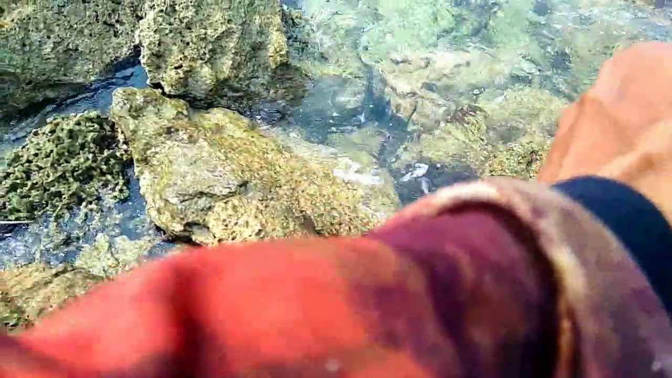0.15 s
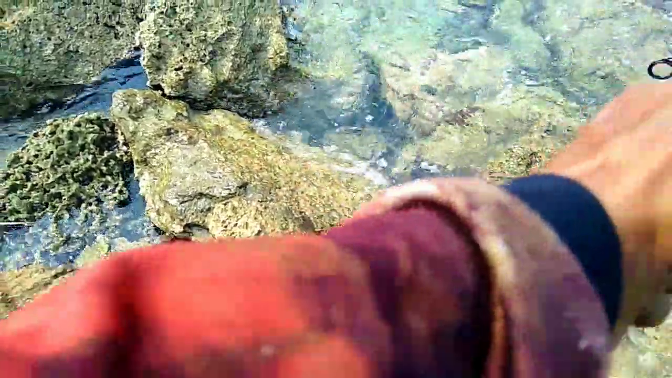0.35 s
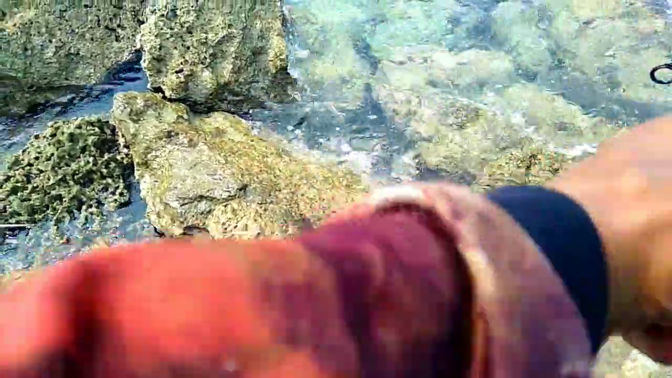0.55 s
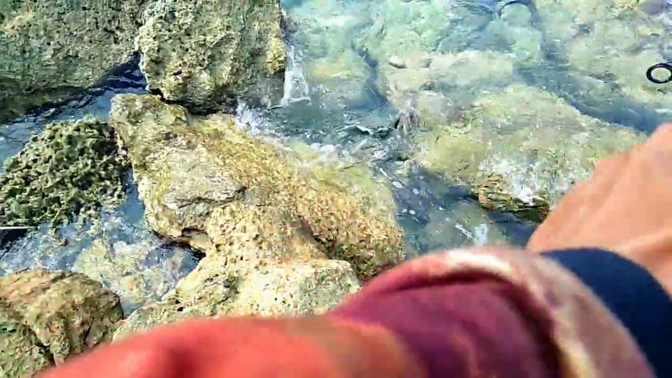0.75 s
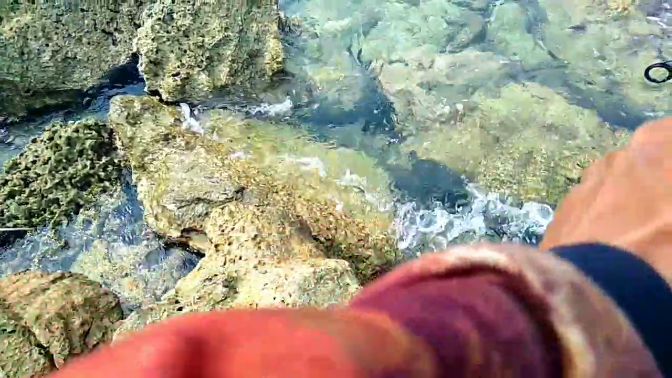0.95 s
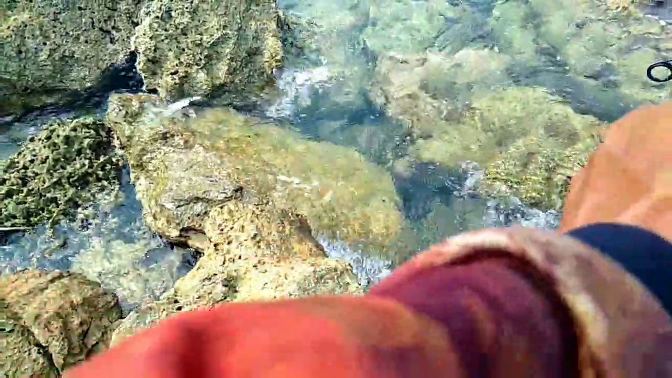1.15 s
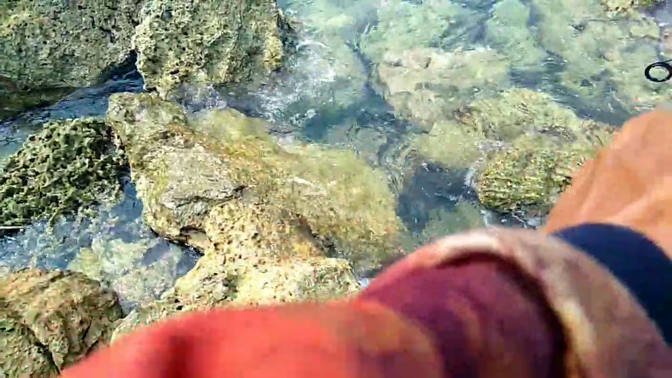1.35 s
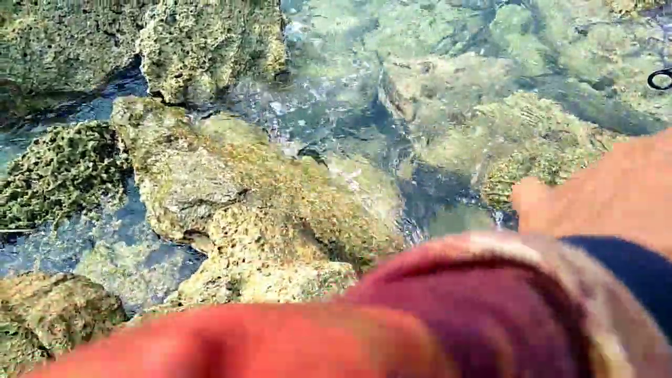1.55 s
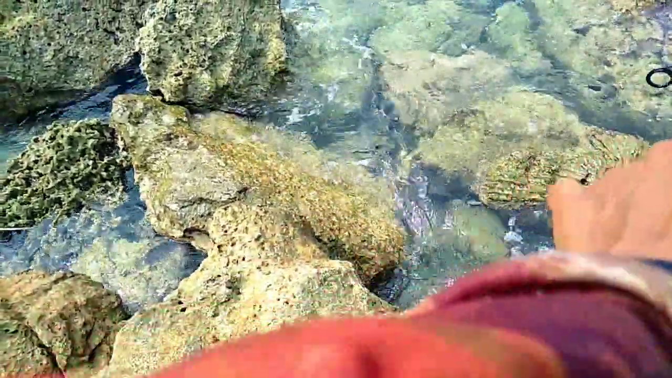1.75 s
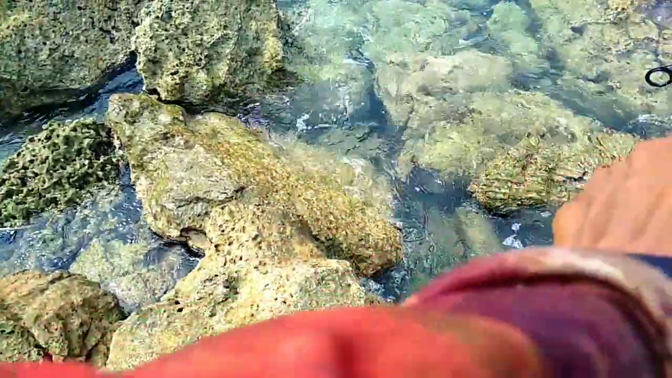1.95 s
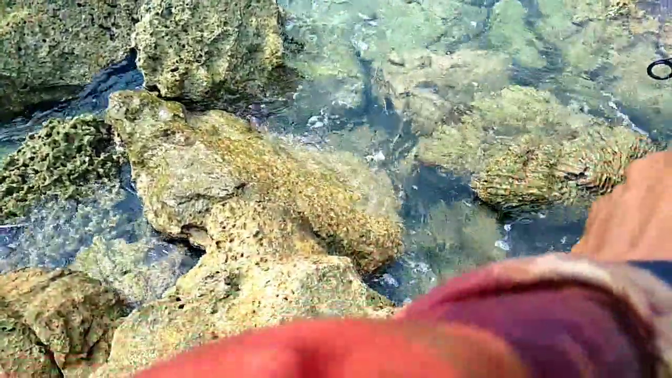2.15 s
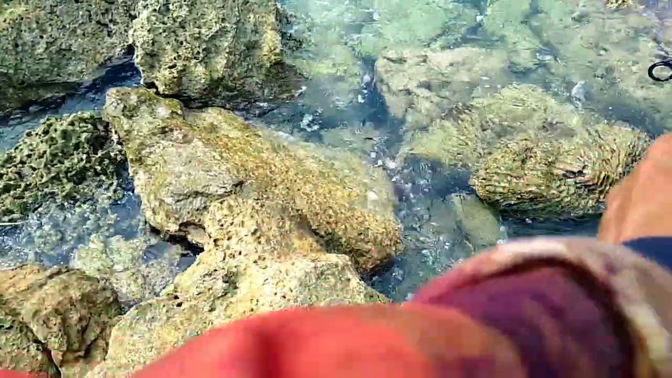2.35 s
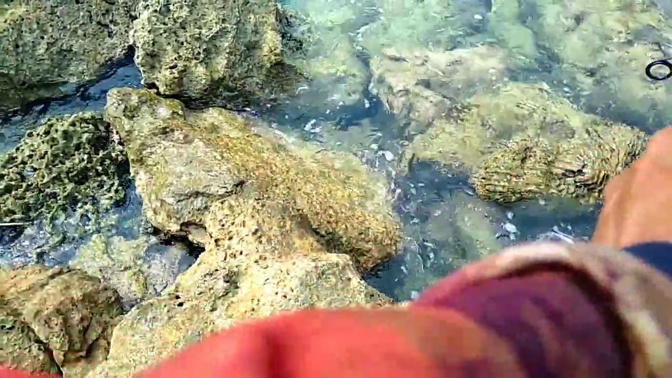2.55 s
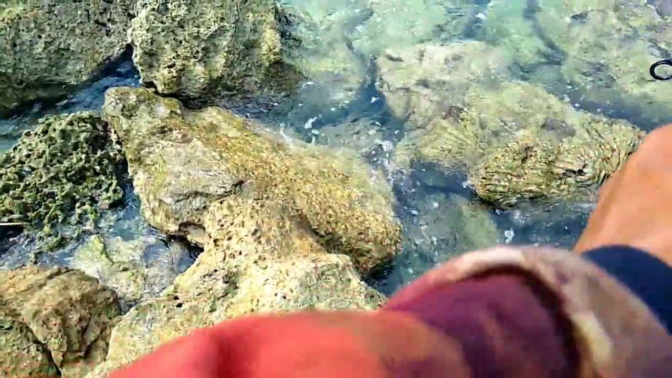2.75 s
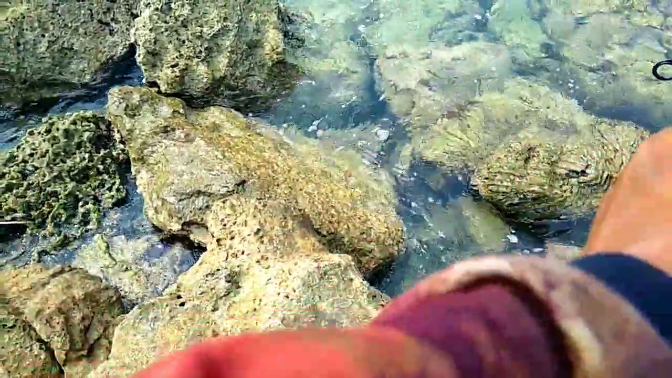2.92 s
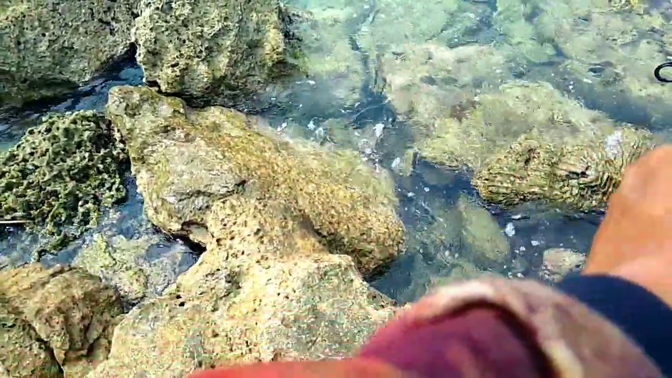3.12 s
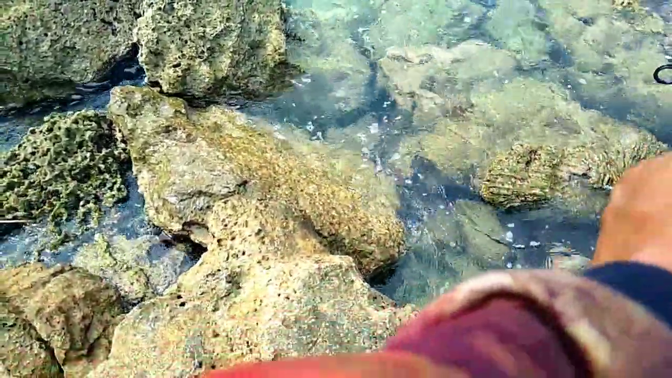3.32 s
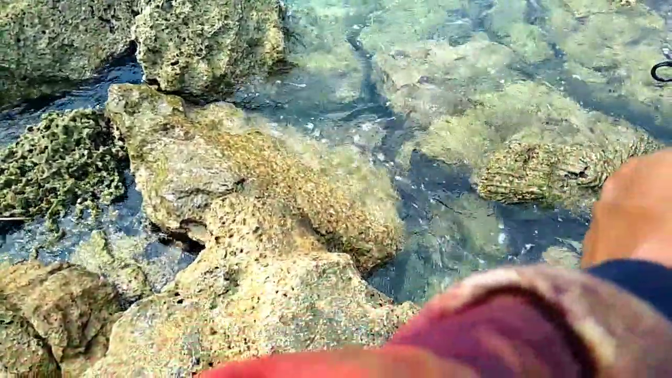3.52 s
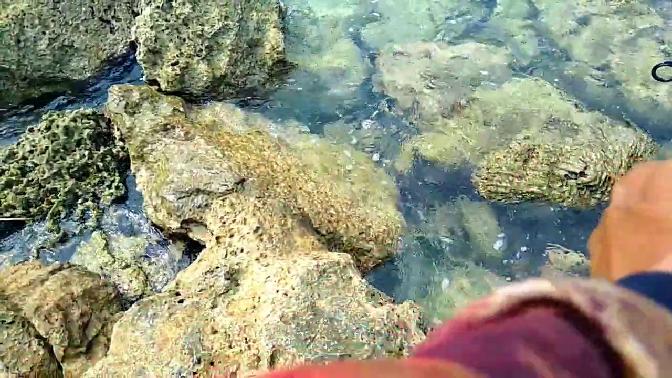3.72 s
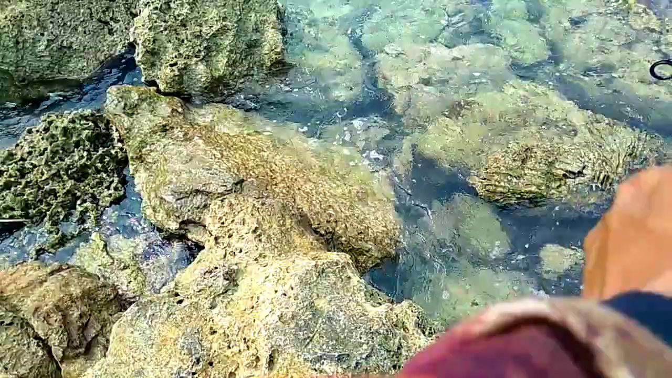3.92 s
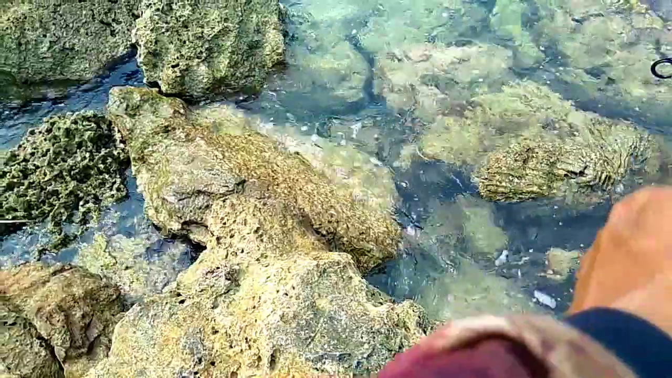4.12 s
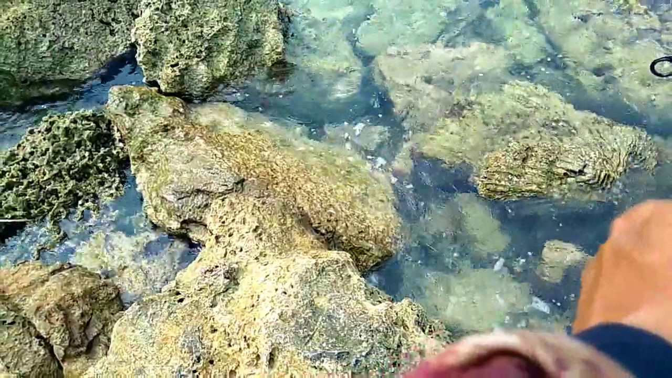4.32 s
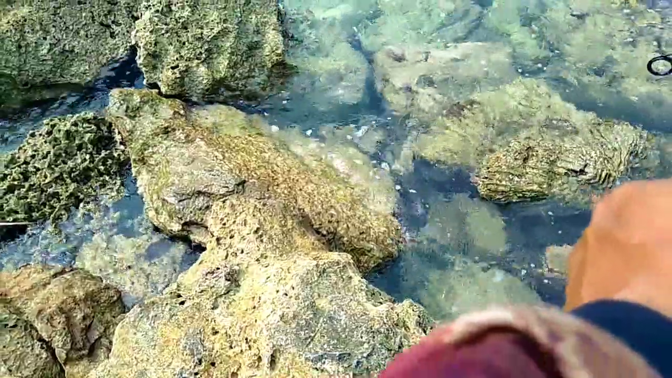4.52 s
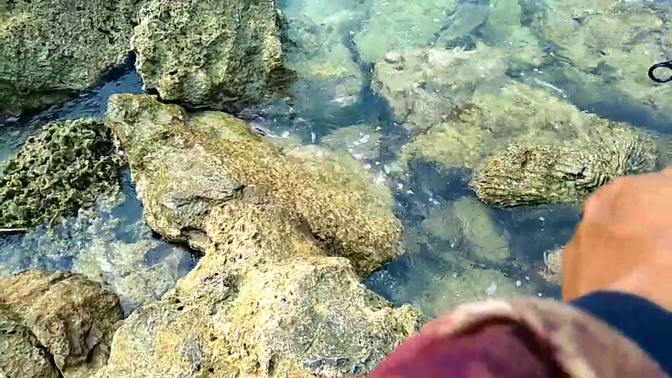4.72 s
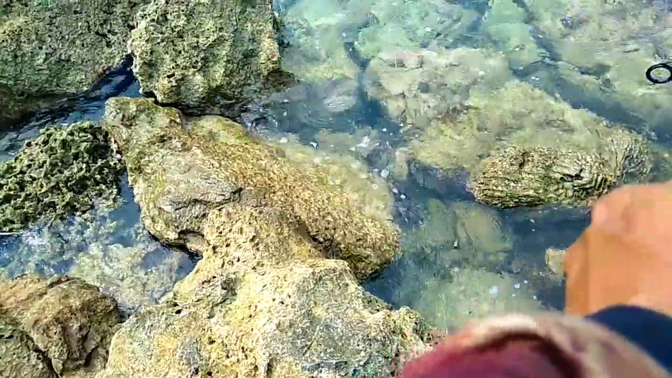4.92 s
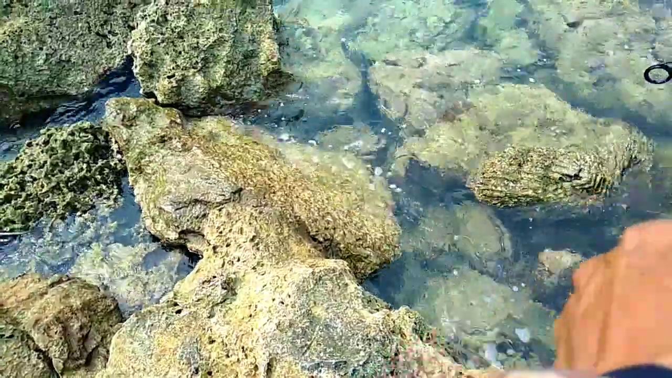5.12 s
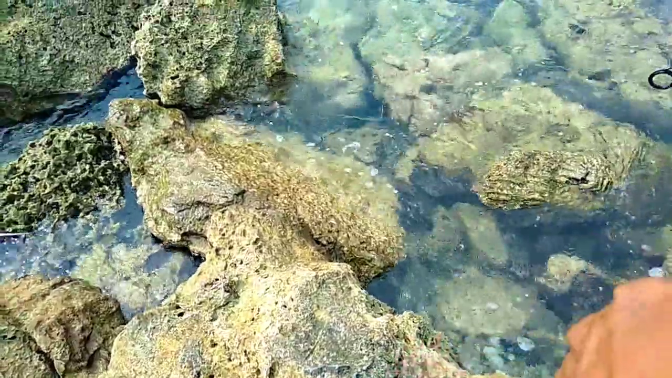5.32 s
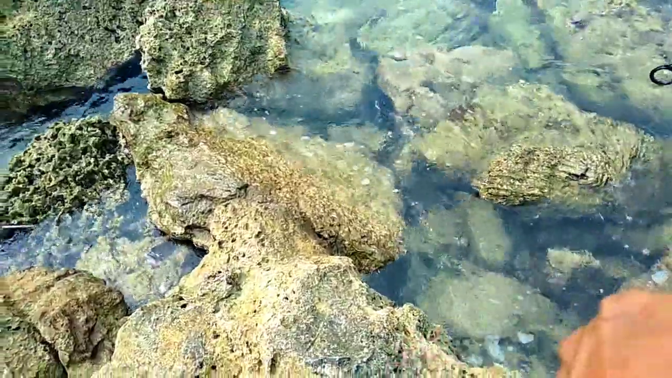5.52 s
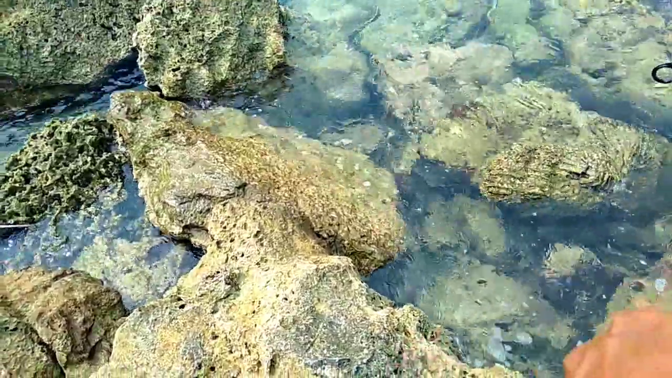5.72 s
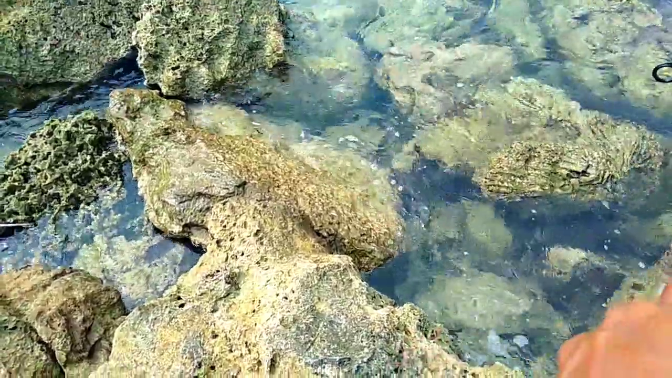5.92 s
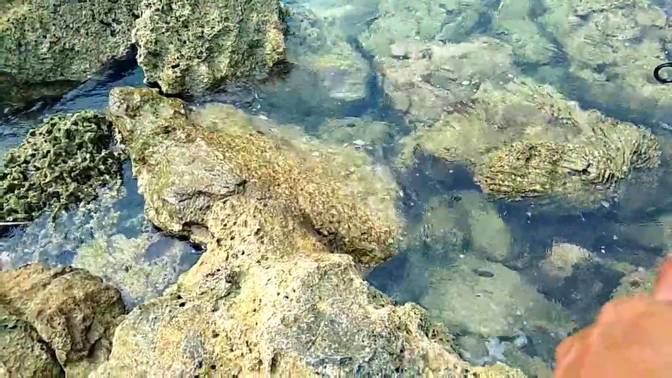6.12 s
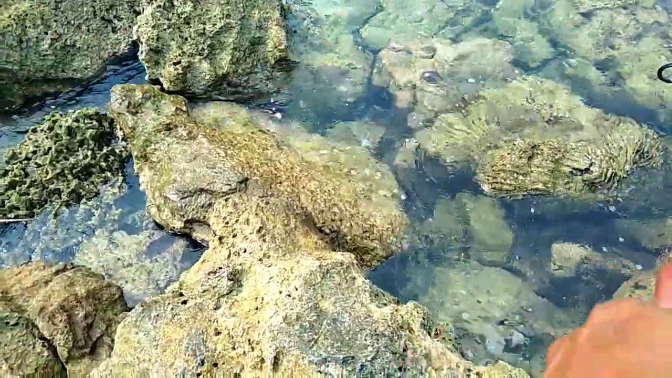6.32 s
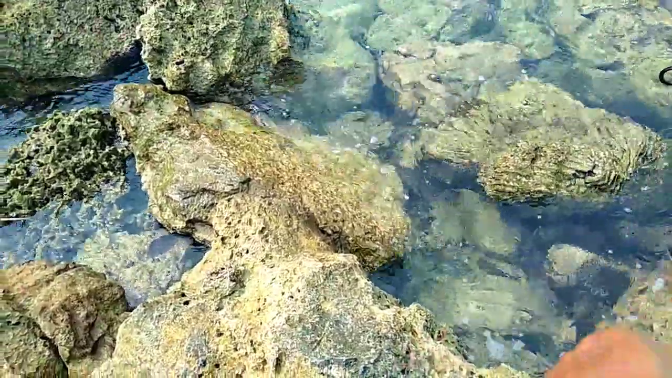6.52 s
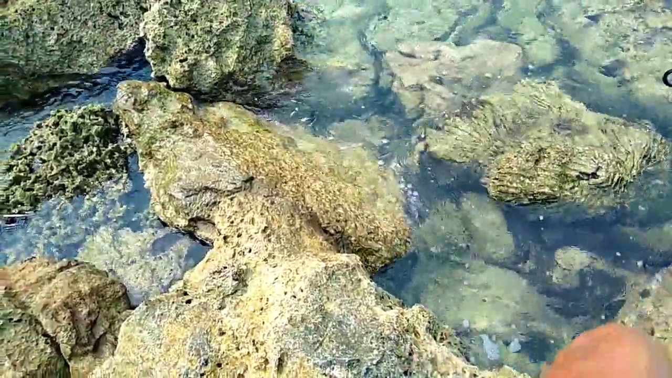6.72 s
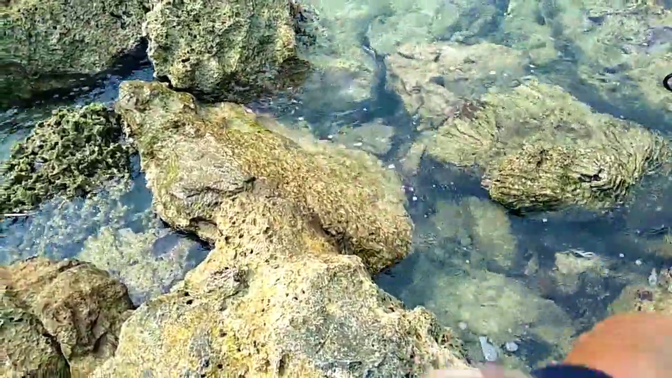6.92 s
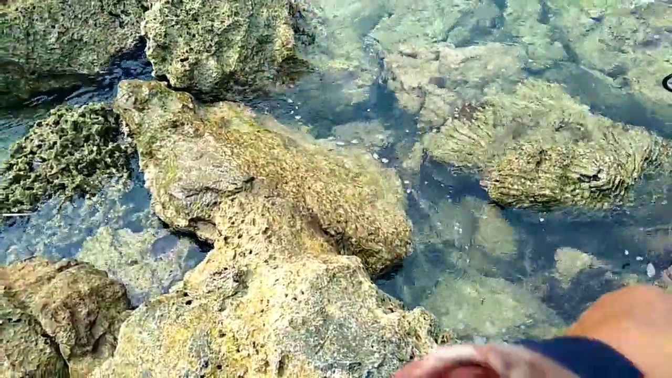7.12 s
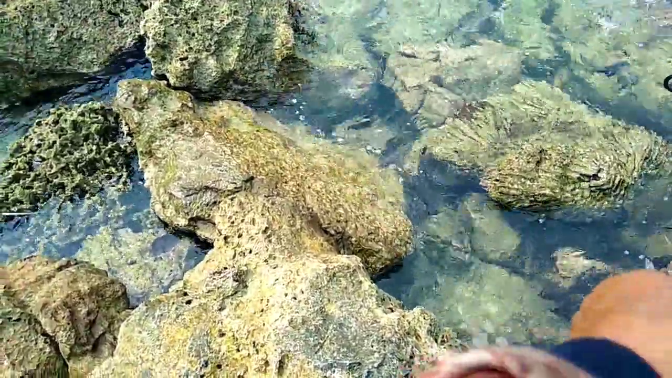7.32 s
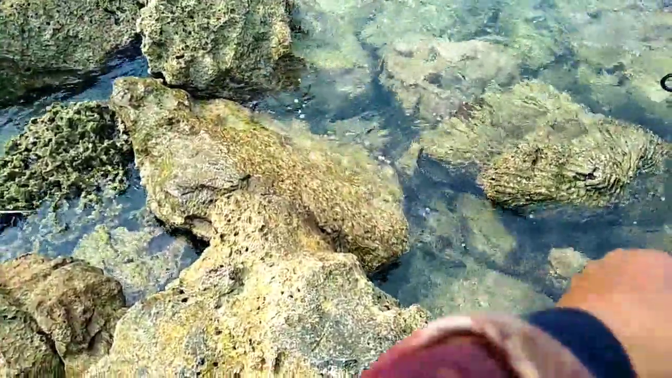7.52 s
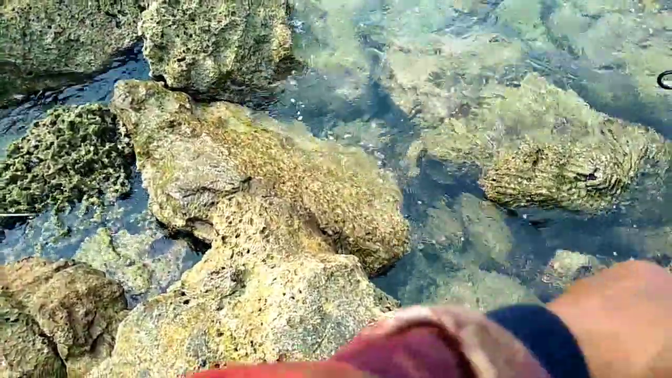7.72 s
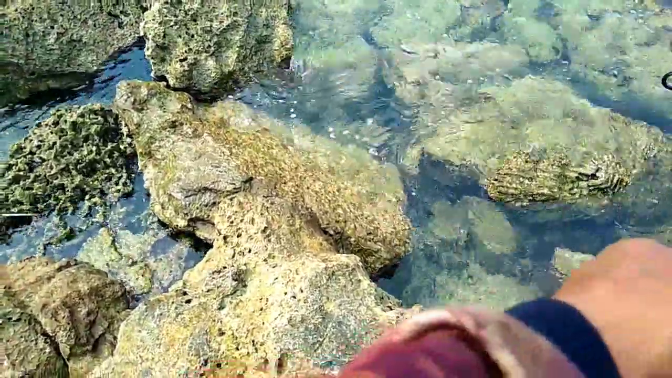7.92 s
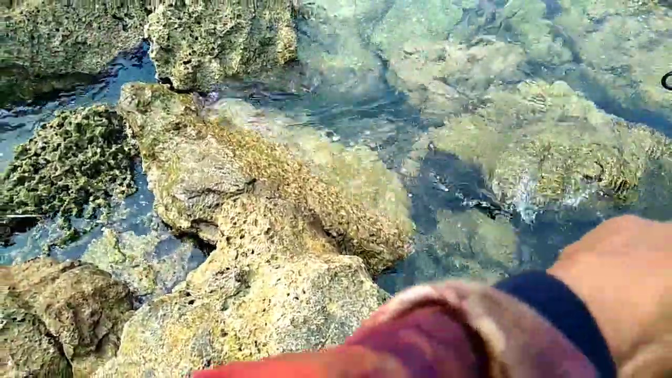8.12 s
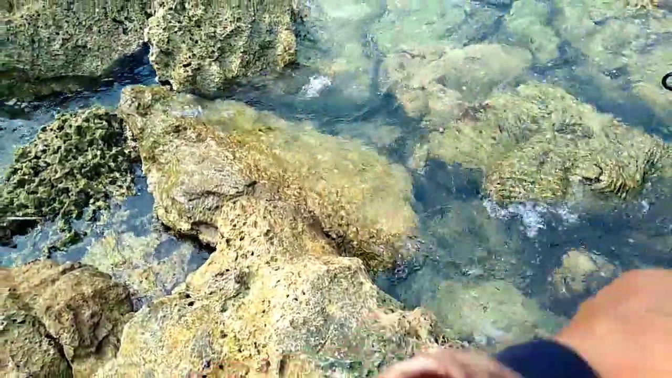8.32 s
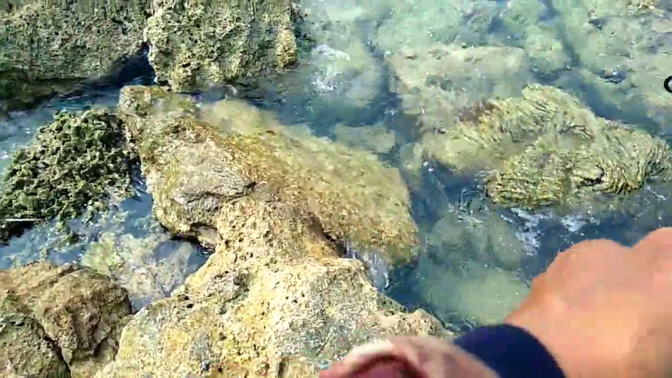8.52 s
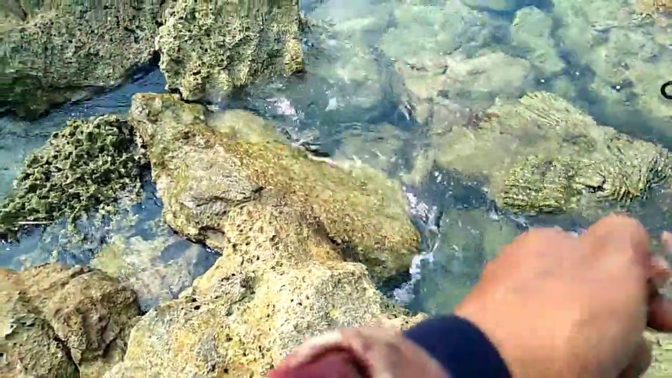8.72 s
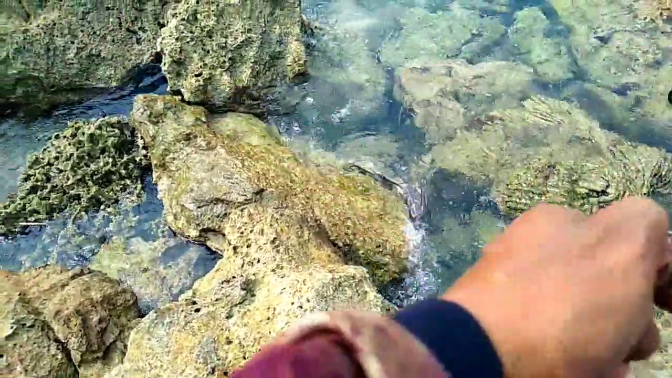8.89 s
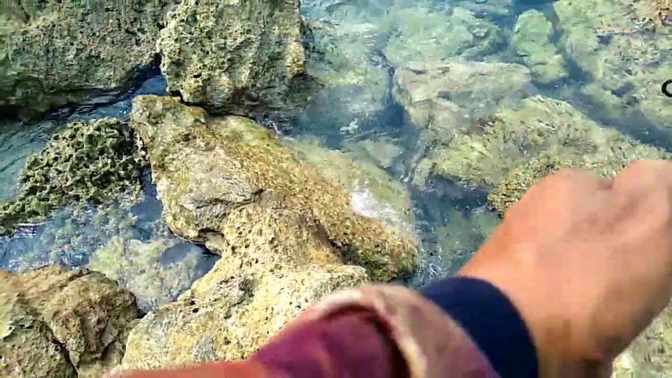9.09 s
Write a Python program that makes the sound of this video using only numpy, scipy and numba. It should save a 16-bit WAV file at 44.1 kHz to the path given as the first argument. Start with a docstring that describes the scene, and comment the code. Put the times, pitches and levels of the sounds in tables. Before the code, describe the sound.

Bubbly water sloshes and glugs among rocks, drains to quiet trickling drops with low wind puffs on the right, then splashes back strongly.

```python
"""A shallow shore of coral rocks: seawater surges over them, drains away in trickles and drips, and surges again.
The water is a swarm of ringing bubbles: big ones gurgle in the hollows, small ones slosh and tinkle, spray crackles.
One flow curve sets how hard the water works; wavelets splash on top of it and slap bubble clusters into crevices.
Drops, plops and glugs stand out of the ebb, and cavities ring upward as they fill; open water washes faintly behind.
A breeze buffets the right microphone port in gusts of short low puffs."""
import sys
import numpy as np
from scipy import signal
from scipy.fft import rfft, irfft
from scipy.io import wavfile
from scipy.ndimage import uniform_filter1d
from numba import njit

SR = 44100
rng = np.random.default_rng(int(sys.argv[2]) if len(sys.argv) > 2 else 0)


def unload_wav(signal):
    """Save mono or channel-first audio to the path in sys.argv[1] as 16-bit WAV at rate SR, clipped to [-1, 1]."""
    wavfile.write(
        sys.argv[1],
        SR,
        np.round(np.clip(np.atleast_2d(signal).T, -1, 1) * 32767).astype(np.int16),
    )


N = 403515
T = np.arange(N) / SR

# All levels are those before record(), which also turns everything down.
# air pockets closing under the rocks:
# (time [s], peak level [dB], pitch [Hz], left minus right [dB], fading time [cycles])
GLUG_EVENTS = [(0.835, -18.5, 297, -2, 1.3), (1.137, -15.5, 235, -1, 7.5), (1.292, -13, 368, -9, 3.1),
               (1.332, -0.5, 273, -2.5, 1.3), (1.44, -11, 330, 0, 1.4), (1.868, -14.5, 466, -2, 2.7),
               (2.241, -16, 350, -3, 0.9), (2.976, -11, 356, -11, 1.6), (3.319, -25.5, 291, -3, 5.4),
               (3.429, -26, 138, -5, 1.8), (3.525, -24, 325, -7, 1.4), (3.832, -21, 150, -17, 1.2),
               (3.943, -18.5, 180, -10, 2.4), (3.96, -32, 422, -3, 6.4), (4.049, -28, 197, -5, 1.3),
               (4.302, -12.5, 259, 2, 3), (4.405, -13.5, 275, -4, 3), (4.449, -20, 165, -15, 1.5),
               (4.515, -15.5, 397, -6, 1.8), (4.568, -21.5, 425, 2, 5.7), (4.764, -22, 181, -5, 0.72),
               (4.894, -26, 205, -5, 2.2), (4.996, -20.5, 278, -3, 3.1), (5.421, -24, 186, -5, 1),
               (5.526, -28, 205, -1, 1.1), (5.683, -11, 234, -1, 0.49), (5.718, -13, 308, -3, 0.58),
               (5.732, -13, 248, -2, 4.1), (6.05, -20, 164, -6, 1.3), (6.261, -21, 128, -5, 1.3),
               (6.307, -14, 290, -5, 1.3), (6.676, -21, 215, -9, 1.6), (6.785, -17.5, 184, 0, 0.62),
               (7.0, -30, 195, -4, 3.3), (7.526, -29, 159, 0, 1.8), (7.63, -22, 208, -1, 1.2),
               (7.674, -21, 435, 1, 4.7), (7.904, -20, 402, -1, 8.6), (7.962, -14, 342, 2, 3.4),
               (8.029, -7, 430, -7, 0.77), (8.756, -8, 420, -5, 1.5), (8.997, -20, 367, -3, 5.1),
               (9.033, -14, 334, -4, 5.6)]


def undb(db):
    """Turn decibels into a gain."""
    return 10 ** (np.asarray(db) / 20)


def unit(x):
    """Scale to an rms of one."""
    return x / np.sqrt(np.mean(x ** 2))


def sides(pan_db):
    """Left and right gains with a mean of one, from left minus right in dB."""
    ratio = undb(np.atleast_1d(pan_db))
    return np.array([2 * ratio, 2 + 0 * ratio]) / (1 + ratio)


def colour(x, points):
    """Filter through (Hz, dB) points; the cepstrum makes a filter that never sounds ahead of its input."""
    hz, db = np.transpose(points)
    size = 4096
    bin_hz = np.arange(size // 2 + 1) * SR / size
    gain = undb(np.interp(np.log(bin_hz + 1), np.log(hz), db))
    cepstrum = irfft(np.log(gain))
    # fold the second half onto the first
    cepstrum[1:size // 2] *= 2
    cepstrum[size // 2 + 1:] = 0
    response = irfft(np.exp(rfft(cepstrum)))
    return signal.fftconvolve(x, response[None], axes=1)[:, :N]


@njit
def rings(start, hz, cycles, rise, glide, gains, lag):
    """Damped sines that swell over `rise` cycles and glide in pitch; each meets the two ports `lag` s apart."""
    out = np.zeros((2, N))
    for k in range(len(start)):
        for c in range(2):
            t0 = (start[k] + (c - .5) * lag[k]) * SR
            first = int(np.ceil(t0))
            last = min(N, first + int((rise + 5 * cycles[k]) * SR / hz[k]))
            for i in range(max(first, 0), last):
                n = (i - t0) * hz[k] / SR  # age in cycles
                if n < rise:
                    envelope = np.sin(np.pi / 2 * n / rise) ** 2
                else:
                    envelope = np.exp((rise - n) / cycles[k])
                turns = n * (1 + glide * n / cycles[k])
                out[c, i] += gains[c, k] * envelope * np.sin(2 * np.pi * (turns + .618 * k))
    return out


def swarm(count, low_hz, high_hz, cycles, rise, glide, spread_db, width_db, lag_ms, size=1):
    """Bubbles born in broods of `size`, close in time, pitch and place; most are faint, a few are loud."""
    birth, brood_pitch, place, vigour = np.repeat(rng.random((count // size, 4)), size, axis=0).T
    delay, own_pitch, chance, length, angle = rng.random((len(birth), 5)).T
    brood_s, kinship = .03, .9
    start = birth * (N / SR + brood_s) + brood_s * (delay ** 2 - 1)
    pitch = (kinship * brood_pitch + (1 - kinship) * own_pitch - .5) / kinship + .5
    hz = low_hz * (high_hz / low_hz) ** pitch
    # loudness follows an exponential law in dB, so that large values are rare
    gain = undb(7 * vigour - spread_db * np.log(1 - .975 * chance))
    # small bubbles make up for their short life; those too high to represent are silent
    gain = gain * hz / high_hz * (hz < .45 * SR)
    pan_db = width_db * (2 * place - 1)
    lag = lag_ms / 1000 * (2 * angle - 1)
    return rings(start, hz, cycles * (.5 + length), float(rise), float(glide), gain * sides(pan_db), lag)


def steady(x, seconds=0.25):
    """Hold the slow level of a texture at one, keeping its fast detail."""
    slow_power = uniform_filter1d(np.mean(x, axis=0) ** 2, int(seconds * SR))
    return x / np.sqrt(slow_power + 1e-12)


def splashes(count, fade_s, spread_db, bed, rise_s=0.0045):
    """Gain of little splashes that break quickly and die away, over a constant bed."""
    when, size = rng.random((count, 2)).T
    kicks = np.zeros(N)
    kicks[(when * N).astype(int)] = undb(spread_db * size)
    fading = signal.lfilter([1], [1, -np.exp(-1 / (fade_s * SR))], kicks)
    return bed + unit(uniform_filter1d(fading, int(rise_s * SR) + 1))


def rocks(x, count=6):
    """The rough rocks round the pool scatter a short tail, a different one for each spot where the water breaks."""
    t60_s, build_up_s, wet_db = .11, .0065, -4.5
    t = T[:SR // 8]
    tails = rng.standard_normal((count, 2, len(t)))
    tails *= np.exp(-np.log(1000) * t / t60_s) * (1 - np.exp(-t / build_up_s))
    tails /= np.sqrt(np.sum(tails ** 2, axis=2, keepdims=True))
    # a spot is drawn every 25 ms, and its share of the sound fades over to the next
    hold = SR // 40
    spot = np.repeat(rng.integers(0, count, N // hold + 1), hold)[:N]
    scattered = np.zeros((2, N))
    for k, tail in enumerate(tails):
        share = np.sqrt(np.abs(uniform_filter1d(1. * (spot == k), hold)))
        scattered += signal.oaconvolve(x * share, tail, axes=1)[:, :N]
    return x + undb(wet_db) * scattered


def swell(s, length, attack_s, release_s):
    """Envelope that rises, holds until `length` is over and dies away."""
    attack = np.interp(T, [s, s + attack_s], [0, 1])
    return attack * np.exp(-np.clip((T - s - length) / release_s, 0, 20))


def flow_db(full_db, slope):
    """Level of one part of the water: `full_db` in a full surge, moving `slope` dB per dB of flow."""
    # how hard the water runs over the rocks, a surge, a long ebb, a second surge: (time [s], flow [dB])
    flow_curve = [(0.0, -44), (0.38, -47.5), (0.85, -35.5), (1.25, -32.5), (1.83, -37.5), (1.95, -46),
                  (2.45, -56), (3.05, -56.5), (4.0, -58), (4.8, -61), (5.8, -61.5), (6.6, -58),
                  (7.05, -53.5), (7.6, -43), (7.85, -34), (8.15, -36), (8.7, -33.5), (9.15, -35.5)]
    full_flow_db = -42.5
    return full_db + slope * (np.interp(T, *np.transpose(flow_curve)) - full_flow_db)


def water_levels():
    """Left and right gains of spray, tinkle and slosh: the power of the flow plus that of each wavelet."""
    # wavelets slapping a rock: (time [s], length [s], level [dB], spray relative to level [dB],
    # slosh relative to level [dB], left minus right [dB])
    laps = [(0.43, 0.12, -36.5, 0.5, -2.5, 0.5), (0.545, 0.044, -36.5, -3, 6.5, -9),
            (0.795, 0.17, -31, 3.5, 1, -5), (0.953, 0.06, -41, 14, -5, -2), (1.182, 0.06, -35, 9, 11, -2),
            (1.799, 0.051, -31.5, 4, -21, 0), (1.975, 0.18, -47, 6.5, -7, 2),
            (2.184, 0.1, -39.5, 0.5, 0.5, 10), (2.531, 0.038, -40, 2, -18, -8),
            (2.624, 0.017, -49.5, 3, 9, -10), (2.769, 0.1, -46, 13, -4, 5),
            (2.904, 0.17, -62.5, 21.5, 13, 3.5), (3.093, 0.061, -62, 14, 15, 2),
            (3.24, 0.035, -61, 11, -4, -4), (3.343, 0.15, -51, 8, 1, 6), (3.45, 0.21, -61.5, 6.5, 14, 6),
            (3.696, 0.048, -61.5, 20, 16, -7), (3.831, 0.23, -57, 4.5, -18, 15),
            (4.126, 0.085, -77.5, 23, 0, 5), (4.28, 0.06, -49, 4.5, 4, 9), (4.551, 0.12, -57, 4, 9.5, 2),
            (4.937, 0.023, -68.5, 16.5, -7, 10), (5.046, 0.071, -43, 5, 2, 4),
            (5.192, 0.012, -48.5, 1, 13.5, 30), (5.932, 0.14, -71.5, 9.5, -14, 4),
            (6.268, 0.09, -61.5, 11, -12, 7), (6.367, 0.056, -57.5, 16.5, 2, 0),
            (6.44, 0.057, -64, -3, 13, 8), (6.674, 0.22, -66, 16.5, 6, -1), (7.015, 0.049, -65, 20, 0, 9),
            (7.108, 0.13, -44, 3.5, 4, 2), (7.357, 0.12, -61, 24.5, -4, 4), (7.77, 0.034, -46, 8, 20, 8),
            (8.236, 0.2, -37, 9, 7.5, 1), (8.663, 0.23, -48, 0, 13, -3), (8.955, 0.12, -28, 1, -14, 0),
            (9.039, 0.1, -28.5, 4, -1, -2)]
    attack_s, release_s = 0.0076, 0.034
    spray = undb(flow_db(-39.5, 1.38)) ** 2 * np.ones((2, 1))
    tinkle = undb(flow_db(-42, 1.36)) ** 2 * np.ones((2, 1))
    slosh = undb(flow_db(-38, 1)) ** 2 * np.ones((2, 1))
    for s, length, db, spray_db, slosh_db, pan_db in laps:
        power = (undb(db) * swell(s, length, attack_s, release_s)) ** 2
        spray += power * (undb(spray_db) * sides(pan_db)) ** 2
        tinkle += power * sides(0.22 * pan_db) ** 2
        slosh += power * undb(slosh_db) ** 2
    return np.sqrt(spray), np.sqrt(tinkle), np.sqrt(slosh)


def stirred():
    """Gain of the commotion in the hollow, which spans a short while before and after each glug."""
    stir_s = 0.037
    power = np.zeros(N)
    for s, db, *_ in GLUG_EVENTS:
        power += (undb(db) * swell(s - stir_s, 2 * stir_s, stir_s, stir_s)) ** 2
    return np.sqrt(power)


def wash():
    """Sloshing, tinkling and spray; a strong surge crowds the bubbles, a weak one leaves them single."""
    # filter curves of the four textures: (frequency [Hz], gain [dB])
    churn_colour = [(120, -33.5), (240, 7.5), (360, 13), (480, -4), (700, 1.5), (1200, -49.5)]
    slosh_colour = [(250, -30.5), (430, 4), (560, -0.5), (800, -1), (1000, -4), (1250, -9), (1800, -64.5)]
    tinkle_colour = [(800, 19.5), (1250, -2.5), (1500, 1), (2000, 3.5), (2550, 4), (3200, 0.5),
                     (4000, -15.5), (5500, -10)]
    spray_colour = [(1500, 9), (3000, -0.5), (4000, -4.5), (4700, -6.5), (5500, -2.5), (6700, -6.5),
                    (8000, -3), (10500, -3.5), (12500, -5.5), (15500, -8)]
    spray_gain, tinkle_gain, slosh_gain = water_levels()
    strength_db = 20 * np.log10(np.maximum(tinkle_gain, spray_gain).mean(axis=0))
    surge = np.clip((strength_db + 70) / 26, .35, .95)
    crowd, lone = np.sqrt(surge), np.sqrt(1 - surge)
    # little splashes that lift the tinkle and spray bubbles together
    burst = splashes(count=480, fade_s=.014, spread_db=13, bed=1.2)
    churn = swarm(count=1500, low_hz=233.0, high_hz=654.4, cycles=3.93, rise=0.73, glide=0.0492,
                  spread_db=1.5, width_db=-4.0, lag_ms=0.27)
    crowded_slosh = swarm(count=3600, low_hz=421.5, high_hz=1410, cycles=4.97, rise=0.68, glide=0.041,
                          spread_db=3.5, width_db=11.5, lag_ms=0.55, size=2)
    blips = swarm(count=400, low_hz=380, high_hz=920, cycles=7, rise=3, glide=.035,
                  spread_db=2.3, width_db=6, lag_ms=.4, size=2)
    plinks = swarm(count=2600, low_hz=1250, high_hz=4300, cycles=11, rise=3.5, glide=.008,
                   spread_db=2.5, width_db=6, lag_ms=.4, size=2)
    froth = swarm(count=14000, low_hz=1032, high_hz=4740, cycles=4.5, rise=1.8, glide=0.012,
                  spread_db=2.9, width_db=9.5, lag_ms=0.44, size=4)
    ticks = swarm(count=8000, low_hz=3800, high_hz=14000, cycles=18, rise=7, glide=0,
                  spread_db=2.3, width_db=7, lag_ms=.4)
    fizz = swarm(count=30000, low_hz=3060, high_hz=15800, cycles=7, rise=3, glide=0,
                 spread_db=2.9, width_db=12, lag_ms=.4, size=2)
    slosh = lone * unit(blips) + crowd * unit(crowded_slosh)
    tinkle = lone * unit(plinks * burst) + crowd * unit(froth * burst ** 0.04)
    spray = 3.4 * lone * unit(ticks * burst) + crowd * unit(fizz * burst ** 0.38)
    slosh = steady(rocks(colour(slosh, slosh_colour)))
    tinkle = steady(rocks(colour(tinkle, tinkle_colour)))
    spray = steady(rocks(colour(spray, spray_colour)))
    # the churn follows both the slosh and the glugs
    churn_gain = np.hypot(undb(-3.0) * crowd * slosh_gain, undb(-22) * stirred())
    churn = steady(colour(churn, churn_colour)) * churn_gain
    low = (slosh * slosh_gain + churn) * sides(-2.1)
    return undb(-0.5) * (low + tinkle * tinkle_gain * sides(-0.57) + spray * spray_gain)


def hollows():
    """Large, heavily damped air pockets gurgle under the rocks; some glug loudly and stir up the rest."""
    # filter curve: (frequency [Hz], gain [dB])
    gurgle_colour = [(40, -27.5), (70, -20), (90, 3.5), (130, 5), (200, 8.5), (300, 0), (400, -20.5),
                     (520, -71), (800, -61)]
    s, db, hz, pan_db, cycles = np.transpose(GLUG_EVENTS)
    gurgle_gain = np.hypot(undb(flow_db(-34, 0.089)), undb(-22) * stirred())
    bed = swarm(count=1300, low_hz=79.0, high_hz=459, cycles=2.16, rise=0.2, glide=0.073,
                spread_db=1.5, width_db=-4.5, lag_ms=0.18)
    gurgle = steady(colour(bed, gurgle_colour)) * gurgle_gain * sides(-0.39)
    rise = 1.2
    glugs = rings(s - rise / hz, hz, cycles, rise, 0.014, undb(db) * sides(pan_db), 0 * s)
    return gurgle + glugs


def plops():
    """Single bubbles that swell, ring for a few milliseconds and rise a little as they near the surface."""
    # the loudest single bubbles: (time [s], peak level [dB], pitch [Hz], left minus right [dB])
    plop_events = [(0.047, -20, 670, -9), (0.083, -17.5, 566, -3), (0.465, -19.5, 3040, -7),
                   (0.561, -14.5, 570, -2), (0.674, -15, 1790, 0), (0.77, -17, 900, -3),
                   (0.851, -18, 2230, -12), (0.934, -18, 1100, 10), (1.065, -16.5, 740, -10),
                   (1.203, -9, 890, -2), (1.449, -15.5, 2770, -4), (1.506, -13.5, 570, -5),
                   (1.819, -18.5, 820, -6), (1.848, -26, 1220, 5), (2.046, -24, 1690, 1),
                   (2.192, -24, 530, 5), (2.215, -25, 2510, 20), (2.219, -25, 500, -1),
                   (2.222, -24.5, 1364, 7), (2.244, -25, 694, -1), (2.27, -25.5, 613, 4),
                   (2.43, -28, 1050, -3), (2.491, -40, 1060, -4), (2.538, -32, 1410, 3),
                   (2.825, -28, 673, -2), (2.914, -30, 1065, -5), (2.936, -25.5, 1140, -2),
                   (3.113, -33, 1030, 4), (3.155, -37, 1065, 2), (3.21, -36, 690, -11),
                   (3.38, -30, 1005, 1), (3.558, -31, 870, -13), (3.703, -27.5, 5000, 2),
                   (3.756, -36, 557, -11), (3.865, -34.5, 1970, 2), (4.1, -38, 660, -21),
                   (4.287, -29, 4210, 0), (4.304, -36, 1880, -2), (4.591, -29, 4300, 11),
                   (4.601, -39, 1670, -14), (4.761, -36.5, 4200, 1), (4.854, -45, 2560, -16),
                   (4.926, -41.5, 1370, 14), (4.955, -31, 4020, 7), (5.078, -26, 1110, 6),
                   (5.107, -30, 1850, 6), (5.2, -39, 710, -2), (5.209, -36, 3040, 21),
                   (5.301, -39, 1330, 12), (5.55, -34.5, 1470, 0), (5.961, -30, 1840, -7),
                   (6.029, -32.5, 2000, -9), (6.48, -35, 1410, -15), (6.499, -34, 760, 0),
                   (6.694, -40, 1130, -3), (7.141, -28.5, 1910, 1), (7.208, -31.5, 880, -17),
                   (7.781, -19, 1280, 4), (7.876, -16, 4200, 7), (7.957, -16.5, 620, -5),
                   (8.013, -23, 1130, 0), (8.279, -19, 1680, -7), (8.805, -19, 900, -1),
                   (8.959, -13.5, 1054, 0), (9.054, -10, 2450, -6), (9.06, -10.5, 723, -2)]
    s, db, hz, pan_db = np.transpose(plop_events)
    cycles = 4.5 * np.sqrt(hz / 1000)
    lag = 0.00061 * rng.uniform(-0.57, 1, len(s))
    rise = 4.5
    start = s + 0.0014 - rise / hz
    return rocks(rings(start, hz, cycles, rise, 0.0043, undb(db) * sides(pan_db), lag))


def splats(count=26):
    """Each slap traps `count` bubbles in a crevice; the first come thick and strong, the last straggle."""
    # clusters of like-sized bubbles:
    # (time [s], length [s], rms level [dB], middle pitch [Hz], left minus right [dB])
    splat_events = [(0.125, 0.028, -31.5, 560, 2), (0.452, 0.023, -30, 2750, -4),
                    (0.51, 0.0094, -33, 3440, -9), (0.668, 0.053, -41, 5550, 4),
                    (0.917, 0.0049, -33, 2890, -1), (0.955, 0.019, -26, 850, -2),
                    (1.04, 0.011, -42, 3380, -5), (1.064, 0.011, -21, 835, 4),
                    (1.087, 0.027, -27.5, 3530, -8), (1.196, 0.052, -25.5, 1830, -1),
                    (1.429, 0.03, -29.5, 600, -5), (1.568, 0.017, -28, 610, 6),
                    (1.642, 0.013, -35, 1000, 4), (1.727, 0.0057, -41, 3980, -8),
                    (1.988, 0.018, -37, 816, -2), (2.047, 0.039, -36.5, 733, -6),
                    (2.184, 0.022, -35.5, 2800, 3), (2.265, 0.015, -37, 820, 13),
                    (2.38, 0.015, -44, 1450, 6), (2.43, 0.2, -55, 1800, 8), (2.483, 0.04, -42, 990, -7),
                    (2.538, 0.026, -35.5, 3380, -11), (2.538, 0.012, -45, 1370, 0),
                    (2.627, 0.04, -48, 4300, -18), (2.816, 0.069, -56, 750, 2),
                    (3.105, 0.016, -43, 2820, -4), (3.15, 0.012, -62, 1220, 0),
                    (3.305, 0.03, -45.5, 610, 3), (3.385, 0.071, -47, 3360, -6),
                    (3.412, 0.019, -37, 730, -3), (3.456, 0.023, -41.5, 687, 1),
                    (3.52, 0.028, -47, 2100, 9), (3.62, 0.031, -50, 2110, 4), (3.585, 0.02, -55, 850, -7),
                    (3.742, 0.0083, -45, 3470, -4), (3.79, 0.06, -50, 690, -7),
                    (3.815, 0.089, -51, 2780, 1), (3.94, 0.08, -51.5, 4200, 19),
                    (4.045, 0.019, -45, 5100, 9), (4.11, 0.06, -72, 4200, 5), (4.043, 0.022, -65, 690, -6),
                    (4.29, 0.14, -53, 1660, 8), (4.34, 0.027, -49, 710, -7), (4.435, 0.026, -52, 1080, 4),
                    (4.566, 0.014, -46, 536, -12), (4.59, 0.078, -52, 2190, -19),
                    (4.708, 0.017, -51, 990, 14), (4.78, 0.064, -61, 2500, 3), (4.785, 0.087, -52, 740, -8),
                    (5.076, 0.006, -25, 4770, 7), (5.09, 0.035, -46, 4000, 7), (5.09, 0.074, -48, 1340, 4),
                    (5.197, 0.021, -48.5, 730, 14), (5.203, 0.012, -48, 1900, 17),
                    (5.621, 0.0077, -47, 3360, -7), (5.843, 0.057, -54, 4500, -3),
                    (5.94, 0.026, -52.5, 2190, -1), (6.02, 0.13, -59, 2090, 9),
                    (6.16, 0.053, -55, 700, -15), (6.265, 0.051, -52.5, 2930, 2),
                    (6.273, 0.052, -47.5, 5400, 9), (6.385, 0.033, -48, 4900, 10),
                    (6.43, 0.035, -48, 720, -20), (6.492, 0.016, -49, 790, 1),
                    (6.625, 0.007, -46, 750, -11), (6.662, 0.025, -37, 548, -28),
                    (6.671, 0.088, -49, 4800, -1), (6.765, 0.036, -50, 4540, 8),
                    (6.781, 0.0077, -42, 745, -15), (6.952, 0.04, -46, 3190, -7),
                    (7.108, 0.025, -41, 3030, -4), (7.25, 0.025, -40, 580, -20),
                    (7.29, 0.014, -37, 4630, -3), (7.313, 0.026, -38.5, 627, -12),
                    (7.36, 0.016, -43, 1370, 21), (7.41, 0.022, -39.5, 2600, -5),
                    (7.458, 0.023, -37, 4930, -4), (7.674, 0.014, -43, 605, 7), (7.938, 0.04, -36, 2880, 0),
                    (8.05, 0.015, -30, 2940, -2), (8.172, 0.039, -33, 700, -16),
                    (8.268, 0.0094, -30, 4770, -10), (8.27, 0.044, -26, 724, -11),
                    (8.35, 0.016, -27, 1020, 7), (8.397, 0.019, -36, 2540, -7),
                    (8.524, 0.016, -31.5, 617, -17), (8.556, 0.014, -29, 1170, 6),
                    (8.6, 0.027, -35, 2700, 6), (8.652, 0.012, -39, 720, 1), (8.937, 0.02, -28.5, 5620, -5),
                    (9.122, 0.016, -26, 1170, 11)]
    s, length, db, hz, pan_db = np.repeat(splat_events, count, axis=0).T
    when, pitch, size, place, angle = rng.random((len(s), 5)).T
    age = ((np.arange(len(s)) % count + when) / count) ** 1.4  # from 0 to 1 through the splat
    hz = hz * 2 ** (0.413 * (2 * pitch - 1))  # octaves either side of the middle
    cycles = 4.6 * np.sqrt(hz / 1000)
    # the bubbles of a cluster share its energy
    share = (undb(27 * size - 12.5 * age) ** 2).reshape(-1, count)
    share = (share / share.sum(axis=1, keepdims=True)).ravel()
    rise = 2.0
    gain = undb(db) * np.sqrt(4 * share * length * hz / (cycles + .75 * rise))
    lag = 0.00041 * (2 * angle - 1)
    start = s + age * length - 1 / hz
    gains = gain * sides(pan_db + 5 * (2 * place - 1))
    return rocks(rings(start, hz, cycles, rise, 0.0054, gains, lag))


def gloops():
    """Water fills a cavity: the shrinking air space rings higher and higher, shaken by the flow (smoothed noise)."""
    # filling cavities: (time [s], length [s], first pitch [Hz], last pitch [Hz], rms level [dB])
    gloop_events = [(1.812, 0.029, 757, 1157, -38), (1.868, 0.028, 423, 830, -35),
                    (2.963, 0.035, 320, 963, -24), (3.016, 0.036, 530, 860, -35),
                    (4.252, 0.024, 860, 1060, -47), (4.584, 0.022, 415, 440, -38.5),
                    (5.017, 0.038, 835, 1445, -40.5), (7.36, 0.062, 445, 582, -34),
                    (8.691, 0.11, 277, 378, -27.5), (8.745, 0.029, 470, 612, -21.5),
                    (8.785, 0.044, 675, 1490, -28)]
    out = np.zeros(N)
    for s, length, first_hz, last_hz, db in gloop_events:
        inside = (T >= s) & (T < s + length)
        fill = (T[inside] - s) / length
        phase = 2 * np.pi * np.cumsum(first_hz * (last_hz / first_hz) ** fill) / SR
        noise = rng.standard_normal((2, SR // 4))
        shake = unit(uniform_filter1d(noise, SR // 350))[:, :len(fill)]
        ring = np.sin(phase) + 0.35 * (shake[0] * np.sin(phase) + shake[1] * np.cos(phase))
        out[inside] += undb(db) * unit(ring * np.sqrt(np.sin(np.pi * fill)))
    return rocks(out * sides(0.86))


def drops():
    """Each drop cracks as it lands and throws a brief patter of finer droplets, coloured round its own pitch."""
    # the loudest drops slapping on water and stone: (time [s], level of the loudest 3 ms [dB],
    # pitch [Hz], left minus right [dB], patter relative to the crack [dB])
    drop_events = [(0.176, -33, 2500, -7, -7), (0.2577, -31.5, 7800, -16, -9),
                   (0.3509, -29.5, 8600, -12, -11), (0.464, -24.5, 3800, -2, -17),
                   (0.5119, -24, 3100, -8, -22), (0.7375, -21, 11100, -4, -18),
                   (0.7506, -17, 14000, -2, -15), (0.8257, -16, 11600, 5, -11),
                   (0.89, -11.5, 11600, -2, -20), (0.919, -16.5, 2700, -4, -20),
                   (0.9315, -12, 10700, 1, -14), (1.0854, -20, 9900, -6, -10),
                   (1.179, -13.5, 10200, -2, -1), (1.277, -20, 12700, 4, -20), (1.516, -14, 10500, 1, -24),
                   (1.7306, -15, 3860, -6, -26), (1.7703, -20.5, 10100, -16, -20),
                   (1.989, -16.5, 13100, -4, -15), (2.0204, -26, 10300, 0, -16),
                   (2.0824, -29.5, 7600, 15, -6), (2.3398, -25, 8700, 22, -13),
                   (2.4066, -35, 12500, 22, -10), (2.5422, -28, 4000, -18, -7),
                   (2.5556, -25.5, 12000, -13, -11), (2.7762, -21, 11000, -14, -20),
                   (2.8153, -15, 12100, -1, -30), (2.8917, -33, 9500, 12, -15),
                   (2.9042, -28, 10700, 20, -20), (2.9883, -27.5, 2430, 1, -24),
                   (3.047, -33, 12100, 13, -7), (3.2205, -27.5, 10500, -4, -7),
                   (3.2596, -30, 10200, -2, -6), (3.351, -31, 12900, -3, -10), (3.384, -28, 10800, -3, -18),
                   (3.409, -24, 5760, -4, -15), (3.5818, -33.5, 11200, 17, 1), (3.834, -34, 12200, 9, -9),
                   (3.9034, -26, 14800, 15, -8), (3.9176, -33, 10000, 22, -20),
                   (3.9844, -34.5, 12100, 22, -18), (4.0595, -28.5, 10600, 22, -13),
                   (4.258, -38, 7840, 22, -17), (4.3365, -33, 6360, 5, -15), (4.4423, -38, 9100, 8, -14),
                   (4.587, -32.5, 12500, 19, -16), (5.0055, -34, 10000, 6, -17), (5.062, -25, 9800, 17, -7),
                   (5.077, -20, 7300, 10, -20), (5.0927, -23, 11500, 9, -11), (5.1205, -29.5, 6000, 10, -7),
                   (5.1926, -30, 12600, 22, -10), (5.2978, -43, 12700, 27, -11),
                   (5.486, -37, 13600, 20, -14), (5.6264, -42.5, 3280, 0, -19),
                   (5.846, -46.5, 4500, 4, -18), (5.927, -31.5, 12900, 4, -8), (5.994, -31, 10500, -4, -17),
                   (6.2956, -35, 5240, 9, -12), (6.4097, -25.5, 10900, 1, -16),
                   (6.6046, -34.5, 14300, -14, -16), (6.7789, -34, 8400, -8, -7), (7.102, -30, 8140, 0, -3),
                   (7.114, -24.5, 11400, 10, -26), (7.1414, -24, 10900, 4, -25),
                   (7.2749, -32, 10300, 16, -24), (7.2957, -38, 4500, 2, -20), (7.3423, -34, 7060, 5, -20),
                   (7.3708, -31, 7060, -4, -20), (7.5225, -32, 12800, 9, -20), (7.863, -16, 14300, 9, -3),
                   (8.0573, -21, 8700, -6, -5), (8.2225, -16.5, 10400, 5, -16), (8.2726, -24, 5260, 4, -13),
                   (8.4115, -14.5, 10200, 3, -18), (9.0616, -12, 8800, -2, -20)]
    # filter curve that all drops share: (frequency [Hz], gain [dB])
    drop_colour = [(400, -12), (1000, 2.5), (2500, 1.5), (4500, 1), (6700, 2), (10500, 4.5), (13000, 0),
                   (15500, -1)]
    rise_s, crack_s, patter_s = .0008, .0011, 0.023
    skirt_db, peak_db, peak_octaves = 6.5, 10, 0.11  # fall per octave off pitch; peak height and width
    ripple_db = 8
    out = np.zeros((2, N + SR))
    t = T[:SR // 8]
    hz = np.linspace(300, 16000, 64)
    colour_hz, colour_db = np.transpose(drop_colour)
    tone_db = np.interp(np.log(hz), np.log(colour_hz), colour_db)
    age = t - 4 * rise_s  # the crack peaks at age zero
    crack = np.exp(np.where(age < 0, age / rise_s, -age / crack_s))
    for s, db, pitch_hz, pan_db, patter_db in drop_events:
        noise = rng.standard_normal((2, len(t)))
        clumps = undb(0.83 * unit(uniform_filter1d(rng.standard_normal(len(t)), SR // 400)))
        patter = undb(patter_db) * clumps * np.clip(age / rise_s, 0, 1) * np.exp(-t / patter_s)
        away = np.abs(np.log2(hz / pitch_hz))  # octaves
        own_db = tone_db - skirt_db * away + peak_db * np.exp(-(away / peak_octaves) ** 2)
        # each drop has its own uneven colour, drawn at random
        own_db = own_db + ripple_db * rng.uniform(-1.2, 1, len(hz))
        drop = colour(noise * (crack + patter), np.column_stack([hz, own_db]))
        # bring the loudest 3 ms of each side to one
        drop /= np.sqrt(uniform_filter1d(drop ** 2, SR // 333, axis=1).max(axis=1, keepdims=True))
        first = int((s + age[0]) * SR)
        out[:, first:first + drop.shape[1]] += undb(db) * unit(sides(pan_db)) * drop
    return out[:, :N]


def breeze():
    """In each gust, eddies hit the right port as puffs of one or two cycles; the left port is sheltered."""
    # gusts at the right port: (time [s], length [s], level [dB])
    gust_events = [(0, 0.22, -20.5), (0.29, 0.29, -24), (0.728, 0.036, -20.5), (1.854, 0.2, -22.5),
                   (2.15, 0.39, -33.5), (2.423, 0.52, -20.5), (3.1, 0.14, -26.5), (3.408, 0.12, -25),
                   (3.7, 0.29, -28.5), (4.285, 0.31, -30.5), (4.656, 0.053, -33), (6.173, 0.096, -27),
                   (6.656, 0.063, -37), (6.958, 0.34, -30.5), (7.782, 0.23, -26.5)]
    # the strongest eddies striking the right port: (time [s], peak level [dB], pitch [Hz])
    puff_events = [(0.579, -11.5, 231), (1.871, -8, 250), (1.969, -9, 164), (2.021, -6.5, 156),
                   (2.158, -10, 157), (2.437, -8, 204), (2.473, -3, 183), (2.546, -10.5, 198),
                   (2.583, -5, 169), (2.605, 0.5, 212), (2.65, -10, 205), (2.75, -7, 204), (2.768, -4, 183),
                   (2.798, -7.5, 169), (2.846, -3.5, 166), (2.899, -6, 198), (2.942, 0, 182),
                   (3.108, -7.5, 155), (3.217, -10.5, 177), (3.285, -12.5, 164), (3.747, -8.5, 226),
                   (3.867, -10.5, 195), (3.999, -6.5, 232), (4.086, -12.5, 156), (4.529, -5.5, 191),
                   (4.716, -12, 188), (5.592, -11.5, 162), (6.962, -5, 155), (7.174, -8, 147)]
    # filter curve of the flutter: (frequency [Hz], gain [dB])
    breeze_colour = [(25, 5), (60, -13), (100, -5), (150, 2), (220, -4.5), (350, -12), (480, -22.5),
                     (900, -83)]
    attack_s, release_s, calm_db = 0.0027, 0.093, -38
    power = undb(calm_db) ** 2
    for s, length, db in gust_events:
        power = power + (undb(db) * swell(s, length, attack_s, release_s)) ** 2
    flutter = swarm(count=900, low_hz=81.0, high_hz=445, cycles=0.37, rise=0.92, glide=0,
                    spread_db=2.5, width_db=-2.5, lag_ms=0)
    gusts = steady(colour(flutter, breeze_colour)) * np.sqrt(power)
    s, db, hz = np.transpose(puff_events)
    rise = 0.74
    puffs = rings(s - rise / hz, hz, np.full(len(s), .65), rise, 0., undb([db, db]), 0 * s)
    return (gusts + puffs) * undb([[-28], [0]])  # left, right


def sea():
    """The faint, dull wash of the open water further out, lapping unevenly: filtered noise."""
    # filter curve: (frequency [Hz], gain [dB])
    sea_colour = [(30, 7.5), (120, -2.5), (200, 9), (340, -12.5), (530, -31), (760, -1), (950, -33),
                  (1300, -35), (2000, -43), (5600, -53.5), (10000, -35.5), (15000, -43)]
    common, own = rng.standard_normal((1, N)), rng.standard_normal((2, N))
    lapping = splashes(count=70, fade_s=0.41, spread_db=0.0, bed=1.0)
    return undb(-45.0) * unit(lapping * colour(common + 1.66 * own, sea_colour))


def scene():
    """Water, rocks and wind together."""
    return wash() + hollows() + plops() + splats() + gloops() + drops() + breeze() + sea()


def record(dry):
    """The recorder turns everything down, the deep bass most of all, and cuts the top."""
    top_hz = 15900
    thin = colour(dry, [(25, -27.0), (68, -16.5), (88, -13.0), (120, -11.0)])
    return signal.sosfilt(signal.ellip(10, .2, 80, top_hz, fs=SR, output="sos"), thin)


dry = scene()
out = record(dry)
unload_wav(out)
```